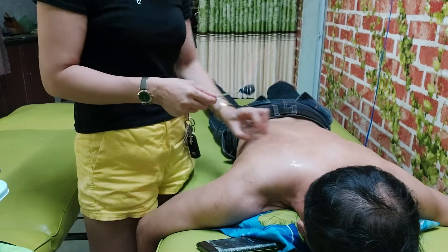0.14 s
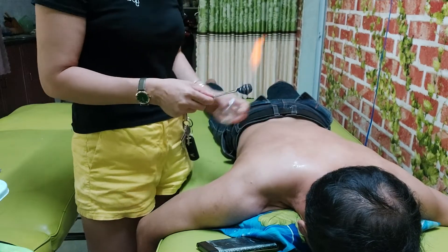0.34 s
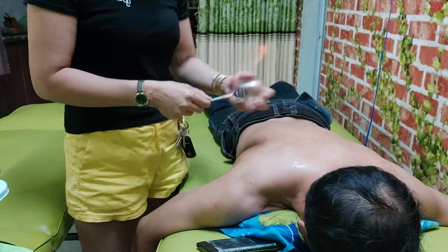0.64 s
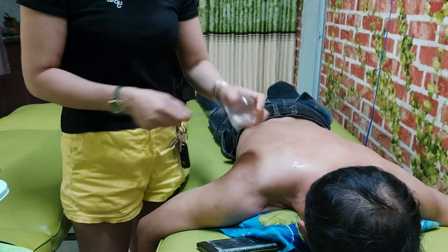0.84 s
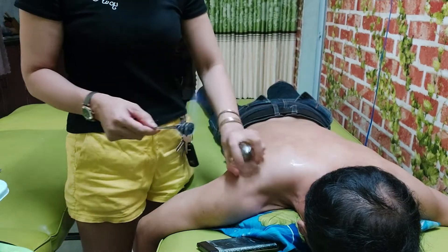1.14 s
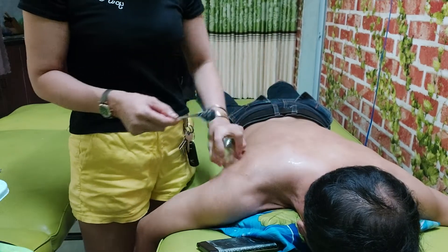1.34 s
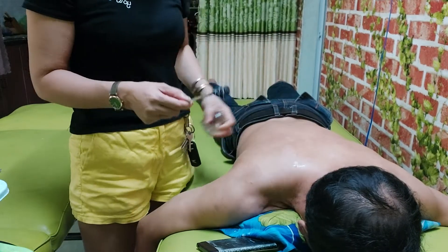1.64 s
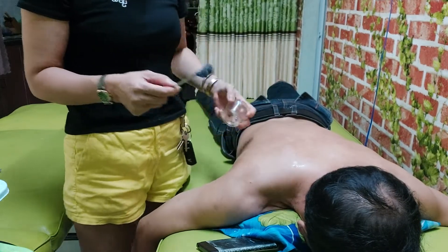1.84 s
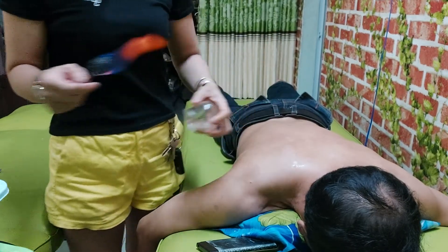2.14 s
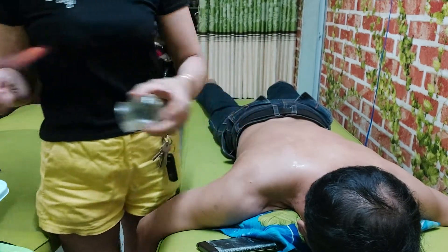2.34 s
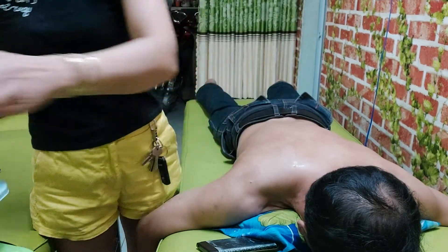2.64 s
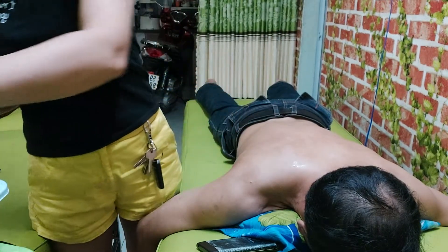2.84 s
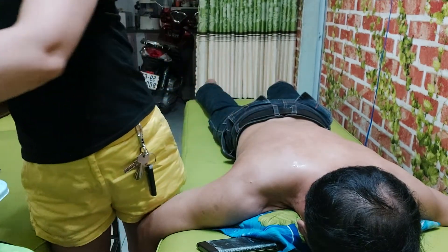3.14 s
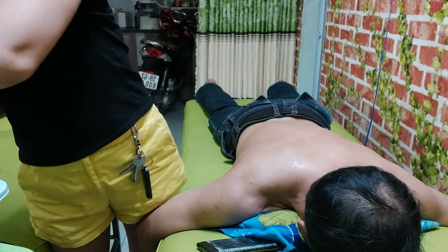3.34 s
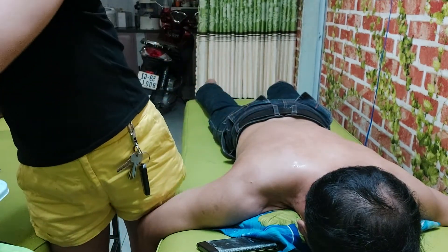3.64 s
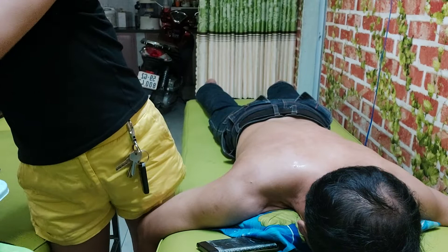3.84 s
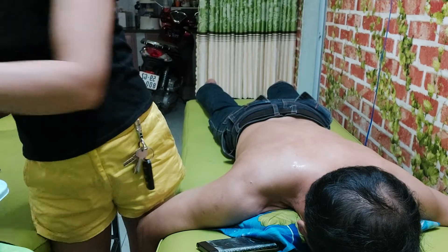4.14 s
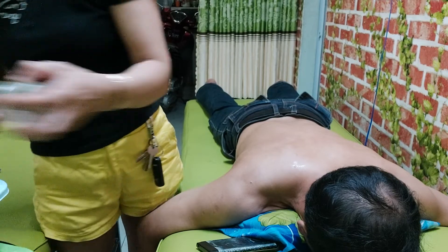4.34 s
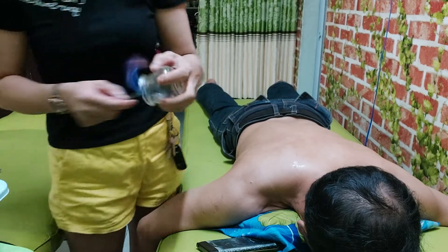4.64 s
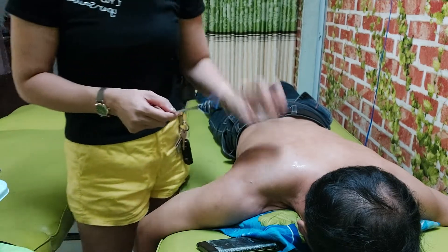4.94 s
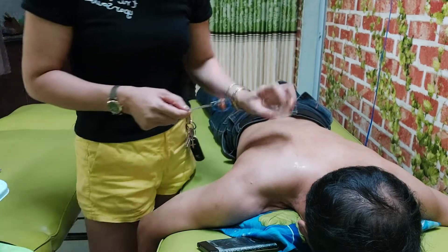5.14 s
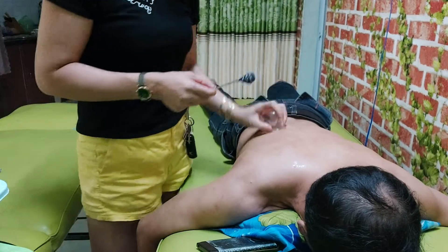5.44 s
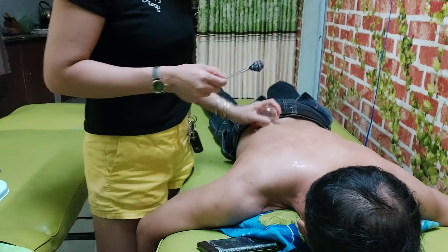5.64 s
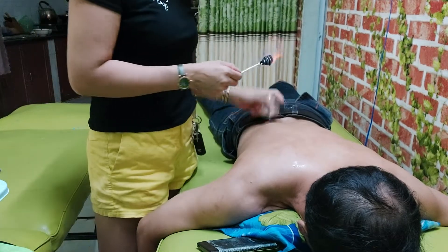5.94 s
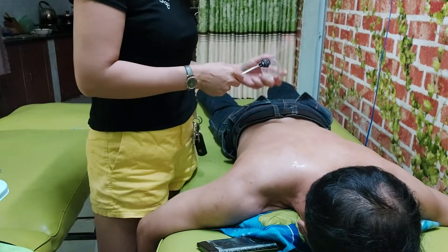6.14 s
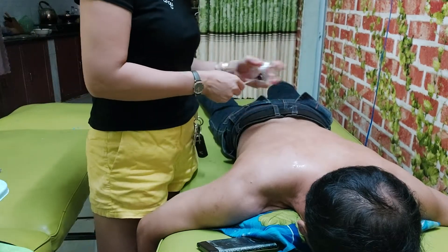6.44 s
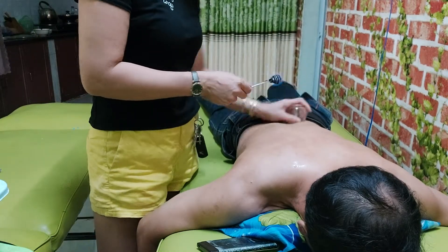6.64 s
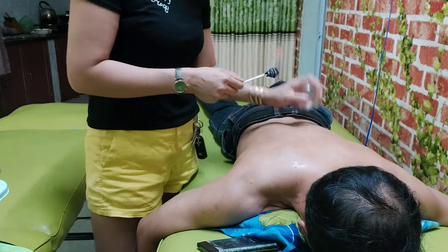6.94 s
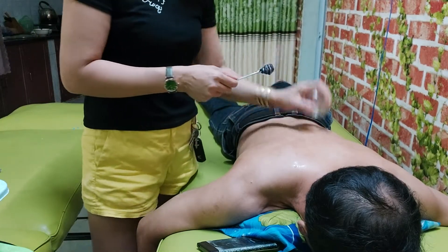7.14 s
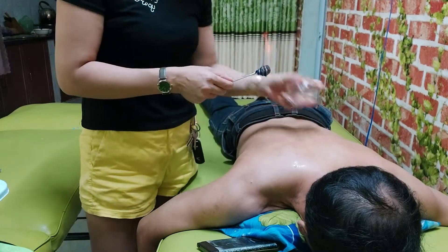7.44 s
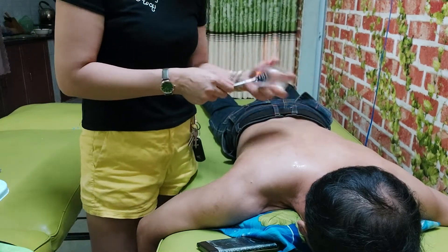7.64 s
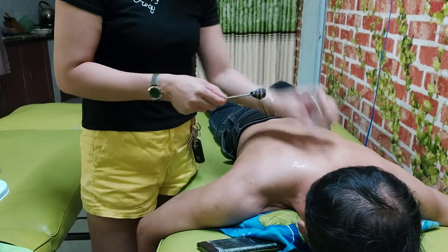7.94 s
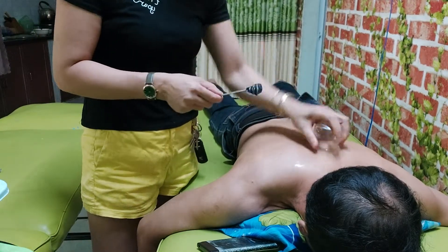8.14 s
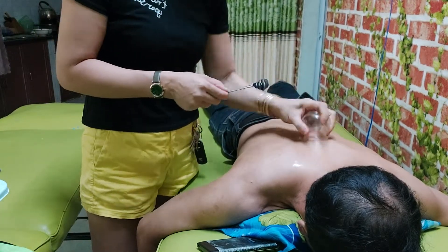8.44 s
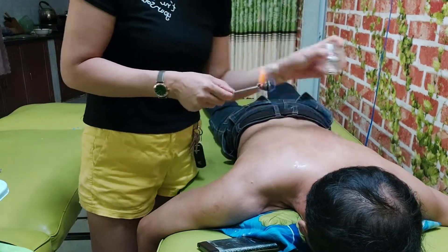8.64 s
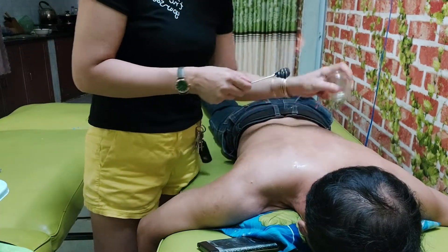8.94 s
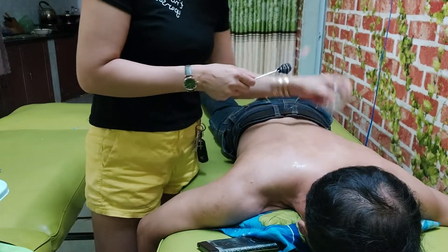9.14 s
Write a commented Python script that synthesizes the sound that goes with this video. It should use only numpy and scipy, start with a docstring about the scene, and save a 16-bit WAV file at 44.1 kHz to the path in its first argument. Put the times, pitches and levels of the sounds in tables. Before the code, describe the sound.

Glass cups slap onto oiled skin and pop off in quick runs, with glass clinks and brief hisses in a small room.

```python
"""Fire cupping: a glass cup is slapped onto oiled skin and pulled off again, over and over.
The air in the cup gives a falling thud as the rim seals and a rising pop as it opens, sometimes
after a hiss of leaking air. Spare cups clatter in a tray to the left, the torch taps the glass
and its flame flutters. Thin whistles come and go over a faint fan, all in a small tiled room."""
import sys
import numpy as np
from scipy import signal
from scipy.fft import rfft, irfft
from scipy.io import wavfile

SR = 44100
rng = np.random.default_rng(int(sys.argv[2]) if len(sys.argv) > 2 else 0)


def store_pcm(level_fs):
    """Save levels as 16-bit WAV."""
    pcm = np.round(np.clip(level_fs, -1, 1) * 32767).astype(np.int16)
    wavfile.write(sys.argv[1], SR, np.atleast_2d(pcm).T)


N = 409248
TIME = np.arange(N) / SR
AGE = np.arange(SR // 2) / SR  # seconds since a sound began
MIC_GAP_S = 0.00045  # time sound takes from the left microphone to the right one
TOP_HZ = 16000


def slaps():
    """The closing gap pulls the cup's air note down; oil smacks and squelches, and the body thumps."""
    # Each row: start in seconds, level in dB, the air's first note in Hz, oil spatter time in seconds.
    landings = [(1.0303, -26, 620, 0.0034), (5.024, -12.5, 870, 0.0015), (5.2471, -15, 890, 0.0027),
                (5.4598, -13, 648, 0.0014), (5.6627, -13, 618, 0.0024), (5.8770, -11, 704, 0.0061),
                (6.6681, -10, 690, 0.00191), (6.8945, -11, 640, 0.0027), (7.103, -12, 872, 0.00187),
                (7.3184, -14.5, 923, 0.0012), (8.052, -15, 870, .0022), (8.862, -23, 800, 0.0022),
                (9.093, -18, 693, 0.00262)]
    # The tone colour of the oil's smack. Each row: frequency in Hz, level in dB.
    smack_colour = [(150, -30), (500, 15.5), (900, 12), (1500, 4), (2300, -5.5), (3500, -10.5),
                    (6000, -14.5), (10000, -17.5), (13000, -15.5), (16000, -28.5)]
    out, oil = np.zeros(N), click(smack_colour)
    for s, db, hz, spatter_s in landings:
        thud = -tone(150 + (hz - 150) * np.exp(-AGE / 0.0018)) * swell(0.0023, 1.74)
        # the squarer a cup lands, the higher its note and the more it smacks and thumps
        squareness = np.log2(hz / 774)
        smack_db = db - 1 + 10 * squareness
        thump_db = db - 16.5 + 23.5 * squareness
        squelch_db = 1.91 * smack_db - 0.5  # grows faster than the smack
        # one sharp contact among many tiny ones as the oil squeezes out
        spatter = rng.standard_normal(len(AGE)) * (0.1 * swell(0.0016, 1) + 0.03 * swell(spatter_s, 0.6))
        spatter[int(0.0012 * SR)] += 0.7
        # the spatter spreads the smack in time; only the oil gives it colour
        spread = irfft(np.exp(1j * np.angle(rfft(spatter))), len(AGE)) * np.exp(-AGE / 0.03)
        smack = 1.423 * signal.fftconvolve(spread, oil)[:len(AGE)]
        # a longer spatter makes the squelch higher, rougher and slower
        wetness = spatter_s / 0.002007
        squelch_hz = 1403 * np.sqrt(wetness) * (1 + 0.24 * np.exp(-AGE / 0.0019))
        wobble = np.exp(0.2 * wetness * band(330, 1300, len(AGE)))
        squelch = tone(squelch_hz * wobble) * swell(0.0013 * wetness ** 1.1, 0.87)
        # the flesh and the padded table give two low, short notes
        thump = steady_tone(62) * swell(0.01, 1) + 1.45 * steady_tone(145) * swell(0.0087, 1)
        oil_sound = amp(smack_db) * smack + amp(squelch_db) * squelch
        add(out, s, amp(db) * thud + oil_sound + amp(thump_db) * thump)
    return out


def pops():
    """The skin springs back and the cup's air rings, rising in pitch as the gap widens."""
    # Each row: start in seconds, level in dB, opening time in seconds, the skin's level in dB.
    pulls = [(0.2203, -20, 0.0096, -15), (1.4964, -7.5, 0.006, -5.5), (5.1066, -10.5, 0.0044, -15),
             (5.3055, -23, 0.0055, -42), (5.5225, -24, 0.0056, -23), (5.9410, -27.5, 0.0121, -34),
             (7.3962, -18, 0.00854, -18), (8.5562, -3.5, 0.0048, -11.5), (8.9140, -32, 0.0059, -42),
             (9.1522, -23.5, 0.0066, -23)]
    out = np.zeros(N)
    for s, db, open_s, skin_db in pulls:
        open_hz = 1053 + 1.5 * db  # a harder pull opens the cup wider, to a higher note
        swell_s = 0.0069 * (open_s / 0.0069) ** 0.74  # a slower pull swells for longer
        note = tone(open_hz * (1 - 0.791 * np.exp(-AGE / open_s))) * swell(swell_s, 2.18)
        skin = steady_tone(270) * swell(0.00072, 1)
        add(out, s, -amp(db) * note - amp(skin_db) * skin)
    return out


def leaks():
    """Air hisses and gurgles through the oil into the cup, growing until the seal breaks."""
    # Each row: peak time and build-up in seconds, hiss and gurgle strength in dB, gurgle pitch in Hz.
    rushes = [(0.22, 0.0067, -42, -45.5, 1430), (1.499, 0.0072, -23.5, -32.5, 1380),
              (8.544, 0.0037, -19, -19.5, 1160), (8.555, 0.0048, -24, -40, 1005)]
    # The tone colour of the hiss. Each row: frequency in Hz, level in dB.
    hiss_colour = [(500, 6.5), (1500, 4), (3000, -3.5), (5600, -8), (8000, -7.5), (12000, 1.5),
                   (16000, -8.5)]
    # Notes that the hiss stirs in the cup's air. Each row: pitch in Hz, width in Hz, level in dB.
    air_notes = [(4460, 1000, -14), (6930, 490, -18.5), (9140, 380, -13)]
    out, lead_s = np.zeros(N), 0.1
    since_peak = AGE - lead_s
    for s, build_s, hiss_db, gurgle_db, hz in rushes:
        flow = np.exp(np.minimum(since_peak / build_s, -since_peak / 0.0058))
        hiss = noise(hiss_colour, len(AGE))
        hiss += sum(amp(db) * band(f, width, len(AGE)) for f, width, db in air_notes)
        air = amp(hiss_db - 2.5) * hiss + amp(gurgle_db) * band(hz, 240, len(AGE))
        add(out, s - lead_s, flow * air)
    return out


def clatter():
    """Each spare cup knocks in the tray and bounces once, more softly."""
    # Each row: start in seconds, tray level in dB, glass level in dB, favoured pitch in Hz.
    knocks = [(2.9332, -15, -21, 8460), (2.9846, -10, -14, 11480), (3.0689, -10, -13, 7700),
              (3.1563, -12.5, -14.5, 7500), (3.2884, -36, -66, 7400), (3.3213, -36.5, -43, 7700),
              (3.396, -15, -10, 15700), (3.4460, -12, -8.5, 6360), (3.5094, -16, -5.5, 5650),
              (3.523, -14, -9.5, 5900), (3.5600, -17.5, -19.5, 7120), (3.6374, -30.5, -49, 6900),
              (3.776, -33.5, -42.5, 7700), (3.8474, -40.5, -53, 7660), (4.1555, -37, -39, 5900)]
    out, bounce_s = np.zeros(N), 0.018
    for s, tray_db, glass_db, hz in knocks:
        add(out, s, knock(s, tray_db, glass_db, hz))
        add(out, s + bounce_s, knock(s + bounce_s, tray_db - 6, glass_db - 2.5, hz))
    return out


def knock(s, tray_db, glass_db, hz):
    """Three cups of slightly different size ring; the tray rattles and sounds a hollow note."""
    # The tone colour of the tray's rattle. Each row: frequency in Hz, level in dB.
    tray_colour = [(100, -53), (380, -18), (560, -2.5), (850, 2.5), (1200, -3), (1900, 0.5), (2600, -5.5),
                   (3400, -9.5), (4150, -8.5), (4700, -24), (6500, -21.5), (7700, -13), (10000, -28),
                   (13500, -25), (15000, -49), (16000, -48)]
    # The hollow note rises as the cups shift. Each row: time in seconds, pitch in Hz.
    hollow_pitch = [(2.97, 563), (3.1, 624), (3.45, 770)]
    # The notes of a glass cup. Each row: pitch in Hz, level in dB, seconds to fade by 60 dB.
    cup_notes = [(1680, -16.5, 0.16), (2110, -11.5, .25), (3800, -15, .15), (4040, -1.5, 0.49),
                 (5520, -0.5, 0.13), (6450, -16, .3), (7360, -6.5, .15), (7640, 5, 0.097), (8150, -5, 0.14),
                 (9050, -16, 0.066), (11510, -29.5, .12), (12740, -5.5, 0.18), (12350, -8, 0.28),
                 (13190, -3.5, 0.12), (13000, 4, 0.043), (15700, -17, .15)]
    rattle = noise(tray_colour, len(AGE)) * (0.56 * np.exp(-AGE / 0.0053) + 0.39 * np.exp(-AGE / 0.018))
    hollow = steady_tone(np.interp(s, *np.transpose(hollow_pitch))) * swell(0.003, 0.39)
    cups = [ring(cup_notes, hz, octaves=0.19, rest_db=-14, detune=0.007) for _ in range(3)]
    attack = 1 - np.exp(-AGE / 0.00028)
    damping = np.exp(-AGE / 0.03)  # cups lying against each other cut their ring short
    glass = np.mean(cups, axis=0) * damping * attack
    return amp(tray_db) * (rattle + amp(-8) * hollow) + amp(glass_db) * glass


def taps():
    """The steel torch and bangles touch the glass with a tick and a short ring."""
    # Each row: start in seconds, strength in dB, favoured pitch in Hz.
    touches = [(0.6753, -23.5, 12300), (0.7478, -18, 3440), (0.824, -32, 7600), (4.7315, -28, 1860),
               (4.823, -39.5, 7750), (6.324, -38.5, 7640), (6.452, -39, 7700), (7.7205, -24.5, 7900),
               (7.758, -17, 9700), (7.9010, -23, 7700)]
    # The notes of the steel and glass. Each row: pitch in Hz, level in dB, seconds to fade by 60 dB.
    steel_notes = [(1160, 14.5, 0.022), (1240, 5, 0.11), (1325, 6, 0.064), (3440, 1.5, 0.025),
                   (3534, -4.5, 0.027), (7600, 3.5, 0.025), (7900, -5, 0.031), (9020, -17, 0.051),
                   (12300, -6.5, 0.057), (13390, -17, 0.14), (14640, -24, .15), (15400, -19, 0.14)]
    out = np.zeros(N)
    for s, db, hz in touches:
        contact_s = 0.0023 * np.sqrt(7700 / hz)  # duller taps stay in contact longer
        rest_db = -15.5 + 0.9 * (db + 12)  # harder taps wake more of the other notes
        tick = band(hz, 1.64 * hz, len(AGE)) * np.exp(-AGE / contact_s)
        ringing = ring(steel_notes, hz, octaves=0.45, rest_db=rest_db, detune=0.004)
        add(out, s, amp(db - 13) * tick + amp(db - 5) * ringing)
    return out


def whistles():
    """Faint, thin, wavering tones that come and go."""
    # Each row: start and length in seconds, first and last pitch in Hz, level in dB.
    glides = [(0, 0.082, 4050, 3970, -59), (0.207, 0.22, 6070, 6000, -52),
              (4.181, 0.086, 6450, 6500, -50.5), (5.679, 0.22, 5800, 6080, -48),
              (5.924, .19, 7660, 7900, -54), (6.042, 0.28, 11660, 11740, -51.5),
              (6.481, 0.65, 11860, 11640, -51.5)]
    out = np.zeros(N)
    for s, length_s, start_hz, end_hz, db in glides:
        size = int(length_s * SR)
        hz = np.linspace(start_hz, end_hz, size) * (1 + 0.0035 * band(47, 38, size))
        voice = tone(hz) + amp(-13) * tone(2 * hz) * (2 * end_hz < TOP_HZ)
        waver_db = 2.5 * band(13, 23, size)
        add(out, s, amp(db + waver_db) * voice * signal.windows.tukey(size, 0.5))
    return out


def flare():
    """The flame's soft rustle swells and fades while the torch is held inside the cup."""
    peak_s, spread_s = 6.4, 0.31
    return amp(-54.5) * np.exp(-((TIME - peak_s) / spread_s) ** 2) * band(710, 910, N)


def flame():
    """The torch flame burns with a low, unsteady flutter."""
    # Each row: time in seconds, strength of the flutter in dB.
    strength = [(0, -39.5), (1.7, -49), (2.0, -55.5), (4.6, -75), (5.6, -48), (6.4, -45.5), (9.28, -50.5)]
    flicker_db = 2 * band(3.2, 7, N)
    return amp(np.interp(TIME, *np.transpose(strength)) - 5 + flicker_db) * band(105, 80, N)


def fan():
    """A fan and its motor hum in a soft wash of air noise."""
    # The tone colour of the air noise. Each row: frequency in Hz, level in dB.
    air_colour = [(18, -36), (30, -12.5), (112, -4), (215, -16.5), (280, -7.5), (345, -13.5), (384, -15.5),
                  (437, -15.5), (721, -13), (1160, -21), (1760, -23.5), (3580, -35.5), (4080, -33),
                  (12000, -43.5), (16000, -42.5)]
    # The notes of the fan and motor. Each row: pitch in Hz, width in Hz, level in dB.
    hum_notes = [(63, 8, -59.5), (303.2, 5, -62.5), (702, 7.2, -60)]
    air = amp(-50) * diffuse(air_colour, N)
    drift_db = 0.6 * band(2, 4, N)
    hum = sum(amp(db) * band(hz, width, N) for hz, width, db in hum_notes)
    return air * amp(drift_db) + hum


def room():
    """The tiled room echoes from all sides; each range of pitch dies away at its own rate."""
    # How long the echo lasts. Each row: frequency in Hz, seconds to fade by 60 dB.
    fade_times = [(80, 0.89), (210, 0.41), (560, 0.52), (1470, 0.53), (3880, 0.41), (10200, 0.38)]
    # The tone colour of the echo. Each row: frequency in Hz, level in dB.
    echo_colour = [(50, -5), (200, -2.5), (400, 1), (900, -1), (2500, 2.5), (7000, 1), (16000, 2)]
    # Low notes held between the walls. Each row: pitch in Hz, level in dB, seconds to fade by 60 dB.
    room_notes = [(64, -69, 0.96), (169.3, -65.5, 0.36), (218.6, -67, 0.68), (292.6, -57.5, 0.59)]
    size = SR
    t, f = np.arange(size) / SR, np.fft.rfftfreq(size, 1 / SR)
    spectrum, tail = rfft(diffuse(echo_colour, size)), 0
    for k, (_, fade_s) in enumerate(fade_times):
        share = read([(row[0], float(j == k)) for j, row in enumerate(fade_times)], f)
        tail = tail + irfft(spectrum * share, size) * fade(t, fade_s)
    tail *= np.clip((t - 0.003) / 0.0014, 0, 1)  # the echo arrives a moment late
    boom = sum(amp(db) * np.cos(2 * np.pi * hz * t) * fade(t, fade_s) for hz, db, fade_s in room_notes)
    return unit(tail) / np.sqrt(size) + boom


def place(sound, echo, lag_s, left_db, echo_db):
    """A sound arrives directly (lag_s later on the right), off near surfaces, and as the room's echo."""
    # Bounces off near surfaces. Each row: delay in seconds, gain as a plain factor.
    walls = [(.0056, 0.29), (.0092, 0.12), (.0185, .16)]
    response = amp(echo_db) * echo
    for side, sign in enumerate((1, -1)):
        response[side, int(max(-sign * lag_s, 0) * SR)] += amp(sign * left_db / 2)
        for k, (delay_s, gain) in enumerate(walls):
            arrival_s = delay_s + (-1) ** k * sign * MIC_GAP_S / 4
            response[side, int(arrival_s * SR)] += gain
    return signal.fftconvolve(sound[None], response, axes=1)[:, :N]


def amp(db):
    """Turn decibels into a gain."""
    return 10 ** (np.asarray(db) / 20)


def unit(x):
    """Scale a sound to an average (rms) level of 1."""
    return x / np.sqrt(np.mean(x ** 2))


def read(points, hz):
    """Read between (Hz, value) points, with every octave equally wide."""
    f, value = np.transpose(points)
    return np.interp(np.log(hz + 1e-3), np.log(f), value)


def noise(colour, size):
    """Noise with the given tone colour."""
    gain = amp(read(colour, np.fft.rfftfreq(size, 1 / SR)))
    return unit(irfft(rfft(rng.standard_normal(size)) * gain, size))


def band(hz, width_hz, size):
    """Noise gathered around one frequency."""
    f = np.fft.rfftfreq(size, 1 / SR) + 0.00075
    off_centre = (f * f - hz * hz) / (f * width_hz)
    return unit(irfft(rfft(rng.standard_normal(size)) / (1 + off_centre ** 2), size))


def diffuse(colour, size):
    """Noise from all sides: left and right are alike in the bass, unrelated in the treble."""
    alike = 0.97 * np.sinc(2 * np.fft.rfftfreq(size, 1 / SR) * MIC_GAP_S)
    mid, side = (irfft(rfft(noise(colour, size)) * np.sqrt((1 + s * alike) / 2), size) for s in (1, -1))
    return np.array([mid + side, mid - side])


def click(colour, size=512):
    """A click with a peak of 1 and the given tone colour."""
    cepstrum = irfft(np.log(amp(read(colour, np.fft.rfftfreq(size, 1 / SR)))))
    # folding the late half onto the early half packs the energy at the start
    cepstrum[1:size // 2] *= 2
    cepstrum[size // 2 + 1:] = 0
    response = irfft(np.exp(rfft(cepstrum)))
    return response / np.abs(response).max()


def ring(notes, favoured_hz, octaves, rest_db, detune):
    """A struck object rings with all its notes; those near the favoured pitch are boosted."""
    hz, db, fade_s = np.transpose(notes)[:, :, None]
    level_luck, pitch_luck, phase = rng.standard_normal((len(notes), 3)).T[:, :, None]
    nearness = np.exp(-(np.log2(hz / favoured_hz) / octaves) ** 2)
    weight = amp(db + 1.7 * level_luck) * (amp(rest_db) + nearness)
    waves = np.sin(2 * np.pi * (hz * (1 + detune * pitch_luck) * AGE + phase))
    return np.sum(weight * waves * fade(AGE, fade_s), axis=0)


def tone(hz):
    """A pure tone that follows a pitch curve."""
    return np.sin(2 * np.pi * np.cumsum(hz) / SR)


def steady_tone(hz):
    """Half a second of pure tone at one pitch."""
    return tone(np.full(len(AGE), hz))


def swell(peak_s, steep):
    """A loudness curve that rises to 1 at peak_s and dies away."""
    return (AGE / peak_s * np.exp(1 - AGE / peak_s)) ** steep


def fade(t, fade_s):
    """A loudness curve that falls by 60 dB in fade_s."""
    return np.exp(-np.log(1000) * t / fade_s)


def add(track, s, sound):
    """Mix a sound into a track at s seconds."""
    i = max(int(s * SR), 0)
    track[i:i + len(sound)] += sound[:max(N - i, 0)]


def scene():
    """The cup works in front of the listener; the tray stands off to the left."""
    echo = room()
    landing = place(slaps(), echo, lag_s=0, left_db=1.4, echo_db=-1.16)
    lifting = place(pops() + leaks(), echo, lag_s=0, left_db=-1.5, echo_db=-3.5)
    torch = place(taps() + whistles() + flare(), echo, lag_s=0.0001, left_db=1.5, echo_db=-4)
    tray = place(clatter(), echo, lag_s=MIC_GAP_S, left_db=4.5, echo_db=-5)
    return landing + lifting + torch + tray + fan() + flame()


def record(dry):
    """The recorder thins the deepest bass, stops at full scale and cuts the highest treble."""
    bass_cut = signal.butter(4, 43, "high", fs=SR, output="sos")
    treble_cut = signal.ellip(10, 0.2, 80, TOP_HZ, fs=SR, output="sos")
    return signal.sosfilt(treble_cut, np.clip(signal.sosfilt(bass_cut, dry), -1, 1))


dry = scene()
out = record(dry)
store_pcm(out)
```